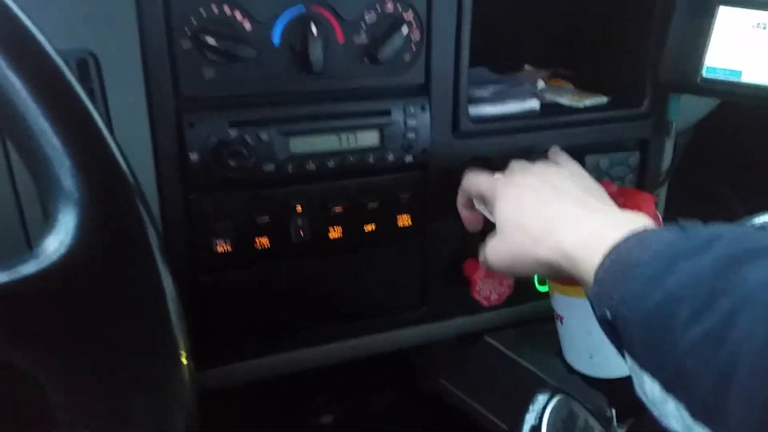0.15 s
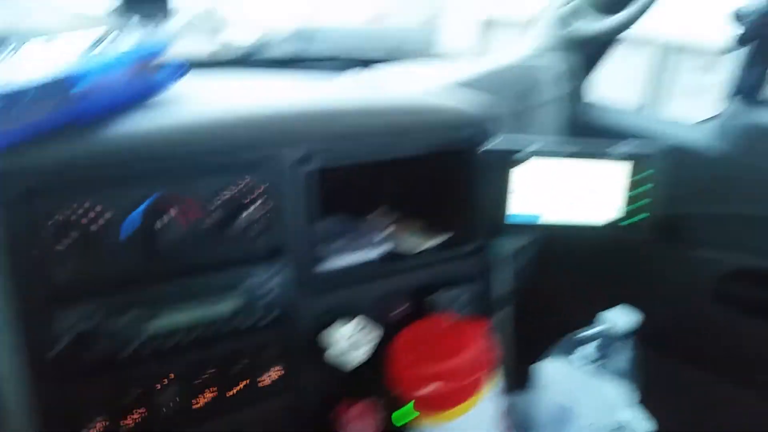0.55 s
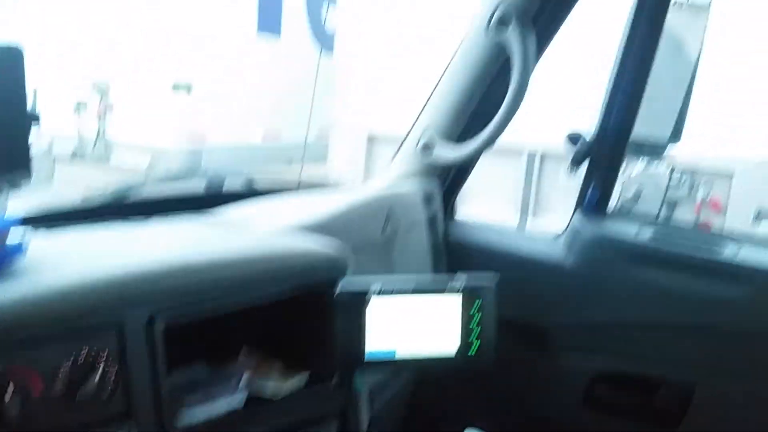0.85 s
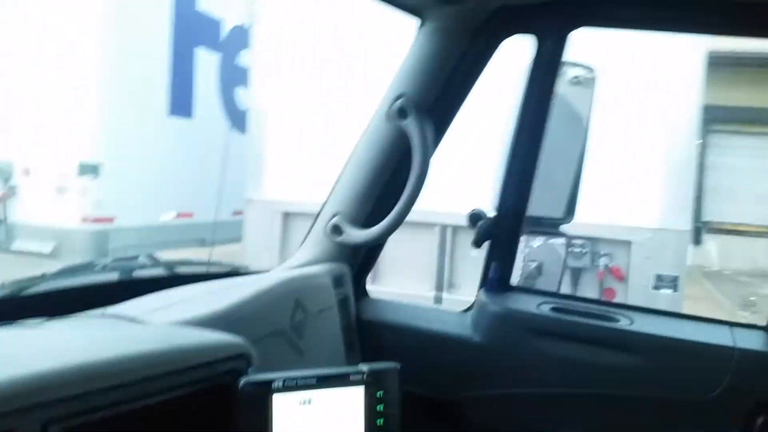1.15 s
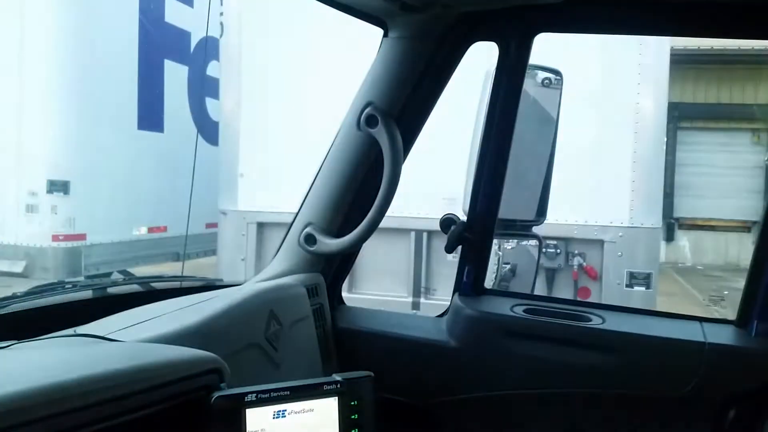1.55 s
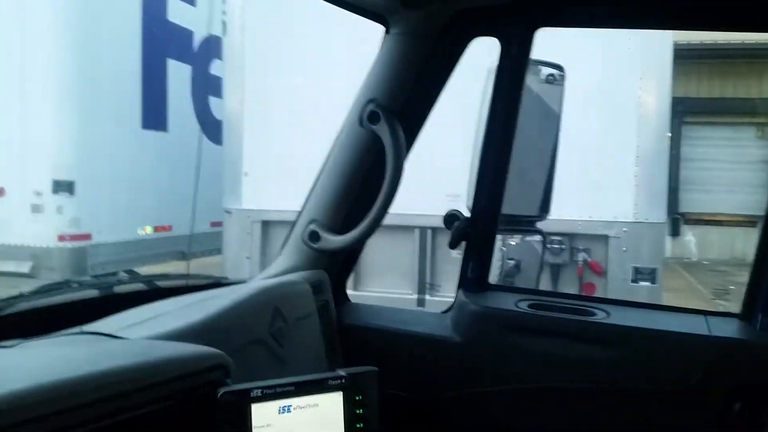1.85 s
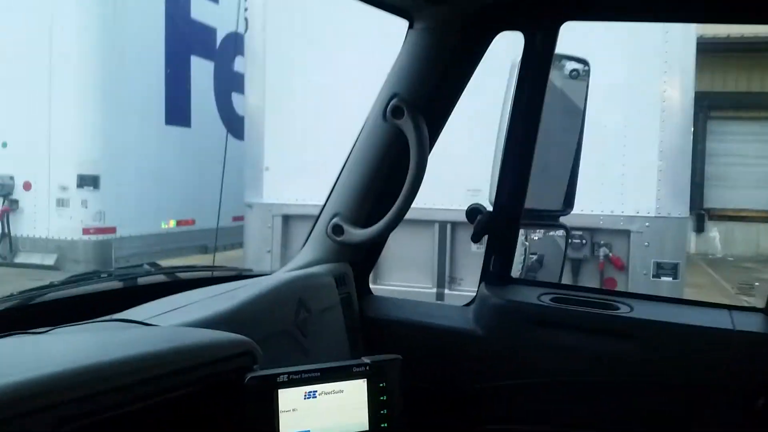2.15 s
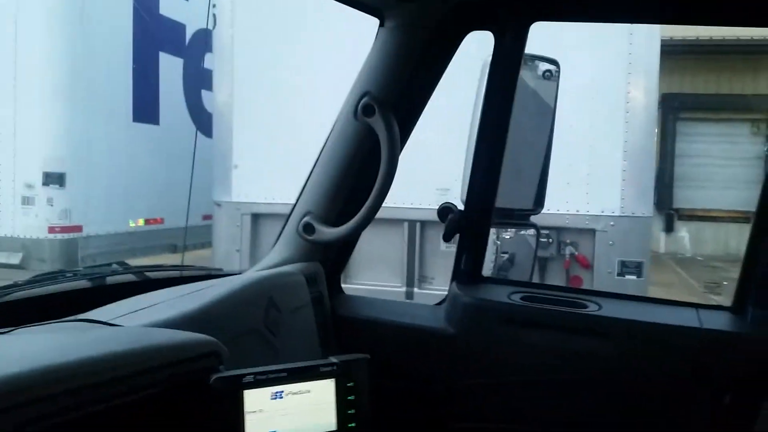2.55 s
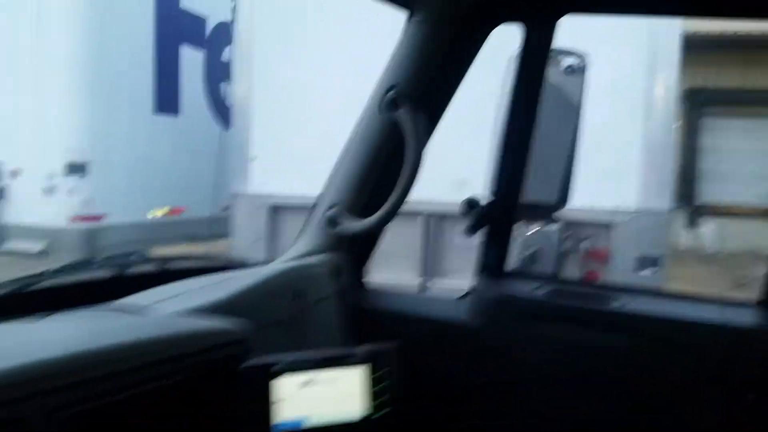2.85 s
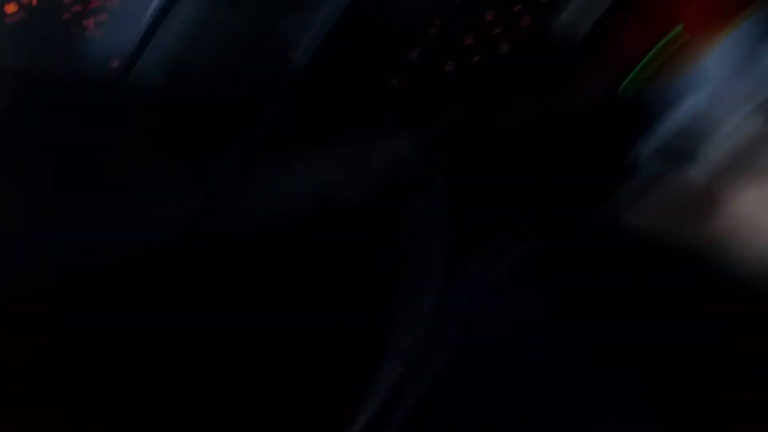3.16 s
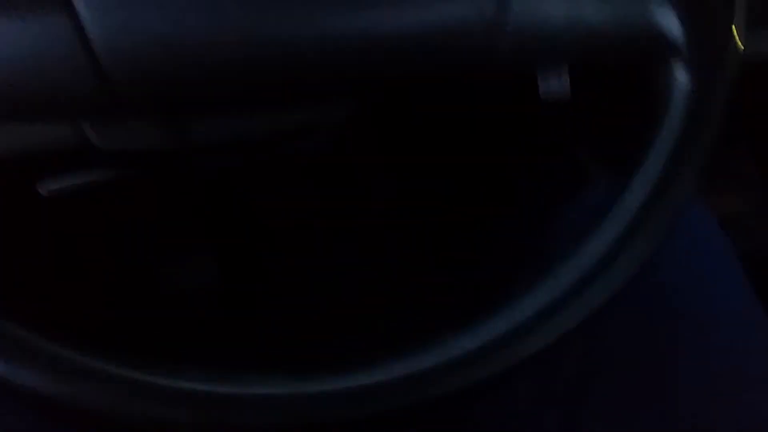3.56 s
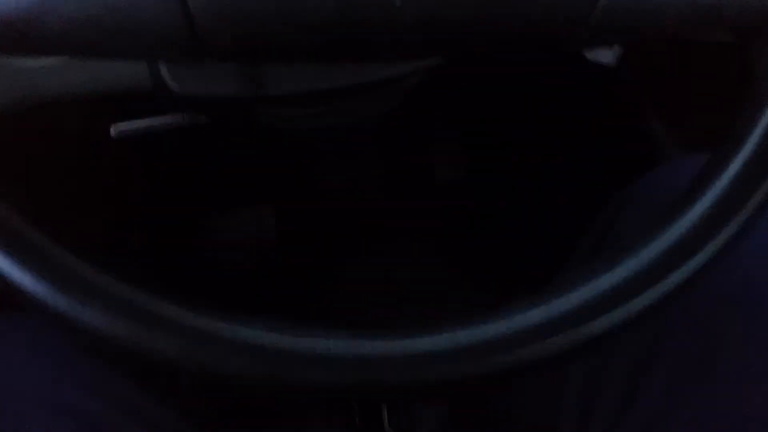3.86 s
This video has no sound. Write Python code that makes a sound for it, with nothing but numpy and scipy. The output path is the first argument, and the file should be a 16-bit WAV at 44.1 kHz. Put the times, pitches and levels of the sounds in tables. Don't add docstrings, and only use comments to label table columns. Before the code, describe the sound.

Air brakes hiss in a parked truck cab: a bright, strong blast at the start fades by about 0.4 s, with a thin leak near 0.55 s. The low diesel idle hums and roars steadily, seeming fuller as the phone's gain recovers. At 1.6-1.8 s a short purge squeaks and ends in a spit; a faint low moan follows until 2.3 s. Tiny puffs and plastic ticks come after 2.9 s, the sharpest snap on the left at 3.7 s.

```python
import sys
import numpy as np
from scipy import signal
from scipy.fft import rfft, irfft
from scipy.io import wavfile

SR = 44100
rng = np.random.default_rng(int(sys.argv[2]) if len(sys.argv) > 2 else 0)


def linear_from_db(decibels):
    return 10 ** (np.asarray(decibels, float) / 20)


def dump(signal):
    limited = np.clip(np.atleast_2d(signal).T, -1, 1)
    pcm = np.round(limited * 32767).astype(np.int16)
    wavfile.write(sys.argv[1], SR, pcm)


N = 176400
CYCLE_HZ = 5.846
LEAD_S = 0.00022

# (multiple of cycle, level [dB rms])
IDLE_LINES = [(3, -42), (4, -46), (5, -44), (6, -32.5), (7, -48), (8, -56), (9, -44), (10, -48),
              (11, -43.5), (12, -34.5), (13, -38), (14, -46), (15, -29.5), (16, -41.5), (17, -37),
              (18, -39), (19, -42), (20, -40), (21, -34), (22, -35.5), (23, -36.5), (24, -35), (25, -51),
              (26, -53), (27, -54), (28, -60), (29, -56), (30, -56.5)]
# (frequency [Hz], level [dB per Hz])
ROAR_LOW = [(22, -24.5), (32, -12), (55, -7), (100, 3), (140, 2), (190, -7.5), (245, -6), (290, -11.5)]
ROAR_HIGH = [(290, -11), (380, -7), (560, -15.5), (780, -17.5), (1300, -26), (2600, -39), (5000, -50),
             (8000, -71)]
# (frequency [Hz], width [Hz], level [dB rms])
PANELS = [(256, 22, -45), (399.6, 49, -46), (673, 2, -61.5), (753, 26, -56), (990, 4, -70), (1278, 28, -60),
          (2764, 290, -68.5)]
# (frequency [Hz], likeness [0-1])
PORT_LIKENESS = [(30, .995), (130, .93), (290, .89), (640, .6), (1300, 0), (3000, .03), (15000, .03)]
# (time [s], share [1 = window, below 0 = turned away])
PHONE_TURN = [(0, -.3), (.5, 0.4), (1, 0.7), (2.3, 0.7), (2.9, 0.1), (3.3, 0), (4, 0.3)]
# (time [s], level [dB])
DASH_FLOW = [(0, -19.5), (.06, -16.5), (.12, -17), (.25, -29.5), (.36, -44), (.52, -60), (.7, -72)]
# (time [s], level [dB])
PURGE_FLOW = [(1.57, -72.5), (1.6, -42), (1.65, -38.5), (1.69, -36.5), (1.72, -38), (1.79, -45), (1.9, -56),
              (2.1, -64), (2.6, -95)]
# (time [s], rise [s], peak [dB], fall [dB/s])
PUFFS = [(.7, 0.093, -74, 20), (.887, 0.0037, -63.5, 507), (1.83, .004, -65.5, 502),
         (2.056, 0.0055, -59, 495), (2.909, 0.0084, -61.5, 305), (2.967, .005, -68.5, 295),
         (2.9, .04, -62.5, 16.5), (3.21, 0.041, -63.5, 50.5), (3.336, 0.0055, -64.5, 306),
         (3.775, 0.0044, -69, 503), (3.91, 0.0063, -68, 514)]
# (time [s], rise [s], peak [dB], fall [dB/s])
REFILL = [
    (.524, .012, -51, 34.5),
    (.56, 0.032, -46.5, 82.5),
]
# (frequency [Hz], level [dB per Hz])
DASH_COLOUR = [(350, 4.5), (1300, -11.5), (2500, -10), (4300, -5.5), (5200, 2), (6200, -1), (8000, 7.5),
               (16000, -1)]
PURGE_COLOUR = [(800, -23), (1500, -6.5), (2600, -3.5), (3400, -10.5), (5500, -5.5), (8500, 1.5),
                (9800, -2.5), (16000, -7)]
PUFF_COLOUR = [(2000, -33.5), (5000, -14.5), (8000, -10.5), (11000, 4), (16000, -1)]
REFILL_COLOUR = [(3000, -32), (8600, -12), (9500, 1), (11000, 4.5), (12500, 1.5), (14300, 3), (15200, -1),
                 (16000, -7)]
SPIT_COLOUR = [(4000, -16.5), (6200, -11), (7000, 0.5), (9000, 3.5), (9900, -8), (11000, 3.5), (13600, 2.5),
               (16000, -10.5)]
VENT_COLOUR = [(2500, -15), (3600, 0), (4300, -5.5), (5000, -0.5), (5900, 2), (6500, -8), (8000, 1.5),
               (9500, -16.5)]
# (time [s], frequency [Hz], level [dB rms])
SQUEAK = [(1.63, 4490, -58), (1.636, 4500, -50), (1.647, 4545, -44), (1.655, 4540, -52), (1.664, 4495, -42),
          (1.676, 4480, -47), (1.686, 4450, -44.5), (1.699, 4490, -48), (1.706, 4480, -64)]
# (time [s], frequency [Hz], level [dB rms])
SLIDE = [(1.678, 4460, -64), (1.685, 4380, -48), (1.692, 4260, -54), (1.699, 4140, -50), (1.705, 4100, -66)]
# (time [s], frequency [Hz], level [dB rms])
MOAN = [(1.8, 232, -60), (1.92, 239, -38), (2.1, 247, -36), (2.22, 253, -38), (2.36, 256, -60)]
# (time [s], peak [dB], brightness [dB], left minus right [dB])
TICKS = [
    (3.336, -54, -32, 16),
    (3.489, -55, -22, 7),
    (3.524, -54, -32, -6),
    (3.602, -47.5, -22, 9.5),
    (3.7356, -41.5, 14.5, 16.5),
]
# (frequency [Hz], level [dB], t60 [s])
PLASTIC = [(2080, 10.5, 0.004), (3290, 6.5, 0.0041)]
# (time [s], gain [dB])
GAIN = [(0, -9), (.1, -14), (.35, -12.5), (.5, -9), (.6, -5.5), (.7, -1.5), (.9, 0), (1.3, 1.5), (4, 2)]
# (frequency [Hz], level [dB])
PORT = [(3000, 0), (5500, -8.5), (7000, -18), (8300, -24), (9200, -16.5), (9900, -8), (13400, 8),
        (15800, 2)]
# (frequency [Hz], left minus right [dB])
PORT_BALANCE = [(100, -1), (230, -3), (1300, 4), (4500, 8.5), (8000, 9.5), (11000, 1.5), (13600, -6.5),
                (16000, -3.5)]


def in_time(rows):
    s, *columns = np.transpose(rows)
    return [np.interp(np.arange(N) / SR, s, c) for c in columns]


def at_hz(points, hz):
    table_hz, value = np.transpose(points)
    return np.interp(np.log(hz + 1), np.log(table_hz), value)


def rms_one(x):
    return x / np.sqrt(np.mean(x ** 2))


def pan(db):
    return linear_from_db([[db], [-db]])


def drift(rate_hz):
    r = np.exp(-100 * np.pi * rate_hz / SR)
    draw = rng.standard_normal(N // 50 + 3002)
    slow = signal.lfilter([1], [1, -2 * r, r * r], draw)[3000:]
    return np.interp(np.arange(N) / 50, np.arange(len(slow)), rms_one(slow))


def coloured(x, points):
    n = x.shape[-1]
    gain = linear_from_db(at_hz(points, np.fft.rfftfreq(n, 1 / SR)))
    return irfft(rfft(x) * gain, n)


def noise(colour):
    alike = np.clip(at_hz(PORT_LIKENESS, np.fft.rfftfreq(N, 1 / SR)), -.999, .999)
    mid, side = rfft(rng.standard_normal((2, N)))
    both = np.sqrt(1 + alike) * mid + np.sqrt(1 - alike) * side * [[1], [-1]]
    return rms_one(coloured(irfft(both, N), colour))


def ringing_noise(hz, width_hz):
    shape = [(-3, -60), (-1, -12), (0, 0), (1, -12), (3, -60)]
    return noise([(hz + widths * width_hz, db) for widths, db in shape])


def swell(start_s, rise_s, peak_db, fall_db_per_s):
    t = np.arange(N) / SR - start_s
    rise = np.sqrt(np.clip(t / rise_s, 0, 1))
    return rise * linear_from_db(peak_db - fall_db_per_s * np.maximum(t - rise_s, 0))


def jet(flow, colour):
    flicker_db = 1 * drift(40)
    return flow * linear_from_db(flicker_db) * noise(colour)


def ticks():
    crack_hz, crack_db = (1850, 5400), 11
    snap_hz, snap_db, snap_delay_s = (10000, 14000), 0.5, .0002
    dull, hard, snap = np.full((3, 2, N), 1e-18)
    for s, db, bright_db, pan_db in TICKS:
        i = int(s * SR)
        dull[:, i] = linear_from_db([db + pan_db / 2, db - pan_db / 2])
        hard[:, i] = -dull[:, i] * linear_from_db(bright_db + crack_db)
        snap_pan_db = np.array([.3, -.3]) * pan_db
        snap[:, int((s + snap_delay_s) * SR)] = linear_from_db(db + 2 * bright_db + snap_db + snap_pan_db)
    out = signal.sosfilt(signal.butter(2, snap_hz, "band", fs=SR, output="sos"), snap)
    out = out + signal.sosfilt(signal.butter(4, crack_hz, "band", fs=SR, output="sos"), hard)
    for (hz, level_db, t60_s), sign in zip(PLASTIC, (-1, 1)):
        r, w = linear_from_db(-60 / (t60_s * SR)), 2 * np.pi * hz / SR
        ring = signal.lfilter([0, np.sin(w)], [1, -2 * r * np.cos(w), r * r], dull)
        out = out + sign * linear_from_db(level_db) * ring
    return out


def moan():
    hz, db = in_time(MOAN)
    return np.sqrt(2) * linear_from_db(db + drift(18)) * np.sin(2 * np.pi * np.cumsum(hz) / SR)


def squeak():
    roughness, pan_db = .22, 5
    rough = 1 + roughness * (drift(110) + 1j * drift(96))
    t = np.arange(N) / SR
    out = 0
    for table in (SQUEAK, SLIDE):
        hz, db = in_time(table)
        tone = (rough * np.exp(2j * np.pi * np.cumsum(hz) / SR)).real
        sounding = (t > table[0][0]) * (t < table[-1][0])
        out = out + np.sqrt(2) * tone * linear_from_db(db) * sounding
    return out * pan(pan_db)


def puffs():
    small_flow = np.sqrt(sum(swell(*row) ** 2 for row in PUFFS))
    refill_flow = np.sqrt(sum(swell(*row) ** 2 for row in REFILL))
    spit_flow = swell(start_s=1.8075, rise_s=.003, peak_db=-36.5, fall_db_per_s=520)
    small, refill = jet(small_flow, PUFF_COLOUR), jet(refill_flow, REFILL_COLOUR)
    return small + refill + jet(spit_flow, SPIT_COLOUR)


def vent():
    flow = swell(start_s=1.76, rise_s=0.098, peak_db=-55.5, fall_db_per_s=50)
    return flow * noise(VENT_COLOUR) * pan(3)


def purge():
    return jet(linear_from_db(in_time(PURGE_FLOW)[0]), PURGE_COLOUR)


def dash_valve():
    return jet(linear_from_db(in_time(DASH_FLOW)[0]), DASH_COLOUR)


def body_roar():
    roar_db, patchy_db, knock_db, knock_start_cycles = -31, 0.5, 0.5, 0.23
    firing_turns = 6 * CYCLE_HZ * np.arange(N) / SR
    firing = np.cos(2 * np.pi * (firing_turns - knock_start_cycles))
    roar = noise(ROAR_LOW + ROAR_HIGH[1:])
    low = signal.sosfilt(signal.butter(2, 600, fs=SR, output="sos"), roar)
    knock = linear_from_db(knock_db * firing + patchy_db * (drift(4.4) + drift(32)))
    roar = linear_from_db(roar_db) * (low + (roar - low) * knock)
    for hz, width_hz, db in PANELS:
        roar = roar + linear_from_db(db + drift(1.3)) * ringing_noise(hz, width_hz)
    roar[1] = np.roll(roar[1], int(LEAD_S * SR))
    return roar


def crank_lines(turn):
    hop = 32
    wander, upper_wander, wander_hz, speed_sway_rad = 0.15, .3, 1.03, 0.004
    stagger, stagger_scatter, crank_start = .114, 0.02, .33
    boom_hz, boom_width_hz, boom_db = 133, 20, 6.5
    upper_db, upper_fall_db, upper_scatter_db = -54.5, -0.0837, 3.5

    step = np.arange(0, N, hop)
    angle = 2 * np.pi * CYCLE_HZ * step / SR
    angle = angle + speed_sway_rad * np.interp(step, np.arange(N), drift(0.96))
    upper = np.arange(31, 91)
    upper_level_db = upper_db + upper_fall_db * (upper - upper[0])
    upper_level_db = upper_level_db + upper_scatter_db * rng.standard_normal(len(upper))
    r = np.exp(-2 * hop * np.pi * wander_hz / SR)
    lines = np.zeros((2, len(step)))
    for k, db in list(IDLE_LINES) + list(zip(upper, upper_level_db)):
        hz = k * CYCLE_HZ
        draw = rng.standard_normal((4, len(step) + 2000))
        sway = rms_one(signal.lfilter([1], [1, -2 * r, r * r], draw)[:, 2000:])
        start = stagger * k ** 2 / 2 + crank_start * k + stagger_scatter * rng.standard_normal()
        phase = np.exp(2j * np.pi * (start + hz * LEAD_S * np.array([[1], [0]])))
        alike = np.clip(at_hz(PORT_LIKENESS, hz), 0, 1)
        mid, side = np.sqrt([[1 + alike], [1 - alike]]) * (sway[:2] + 1j * sway[2:]) / np.sqrt(2)
        loose = wander if k < upper[0] else upper_wander
        envelope = alike ** 2 + loose * (mid + side * [[1], [-1]])
        boom = linear_from_db(boom_db * turn[::hop] * np.exp(-((hz - boom_hz) / boom_width_hz) ** 2))
        wave = boom * envelope * np.exp(1j * k * angle) * phase
        lines += np.sqrt(2) * linear_from_db(db) * wave.real
    return signal.resample_poly(lines, hop, 1, axis=1)[:, :N]


def engine():
    turn = in_time(PHONE_TURN)[0] - .5
    turn_pan_db = -0.6 * turn * [[.5], [-.5]]
    return (crank_lines(turn) + body_roar()) * linear_from_db(turn_pan_db)


def scene():
    air = puffs() + vent() + purge() + dash_valve()
    return ticks() + moan() + squeak() + air + engine()


def top_cut(x):
    return signal.sosfilt(signal.butter(12, 15910, fs=SR, output="sos"), x)


def record(dry):
    treble_hz, treble_extra = 1530, 0.76
    self_noise_db, limit = -67.5, .42
    run_in = 4410
    gain_db, = in_time(GAIN)
    treble = coloured(dry, [(treble_hz / 2, -40), (treble_hz, -6), (treble_hz * 2, 0)])
    x = (dry + treble * (linear_from_db(treble_extra * gain_db) - 1)) * linear_from_db(gain_db)
    x = x + linear_from_db(self_noise_db) * rng.standard_normal((2, N))
    x = limit * np.tanh(x / limit)
    x = np.pad(x, [(0, 0), (run_in, run_in)], "reflect", reflect_type="odd")
    half = np.array(PORT_BALANCE) * [1, .5]
    left, right = coloured(x[0], half), coloured(x[1], half * [1, -1])
    x = coloured(np.array([left, right]), PORT)
    x = coloured(x, [(18, -16), (30, 0), (15810, 0), (16260, -14), (16560, -70)])
    return top_cut(x[:, run_in:-run_in])


dry = scene()
out = record(dry)
dump(out)
```